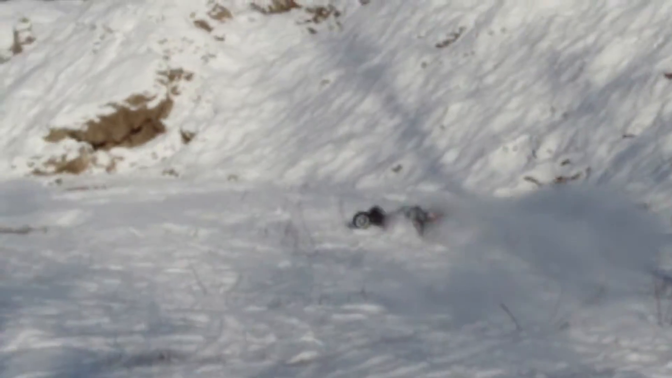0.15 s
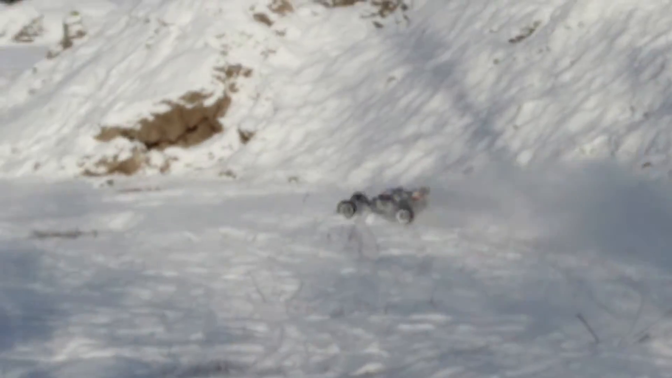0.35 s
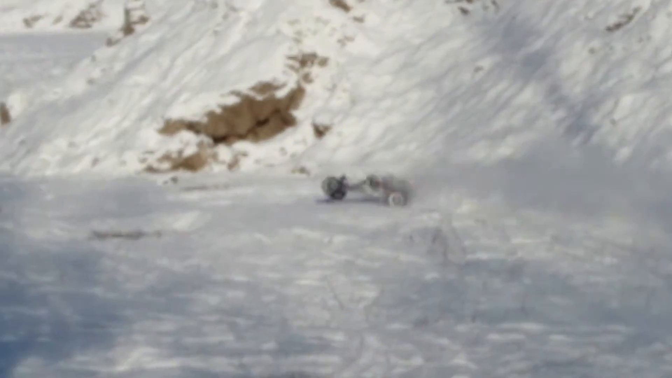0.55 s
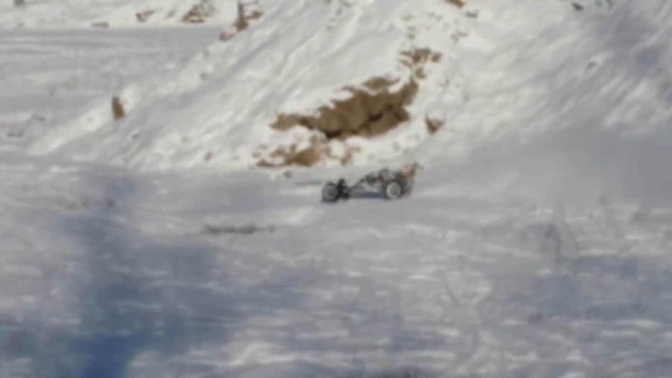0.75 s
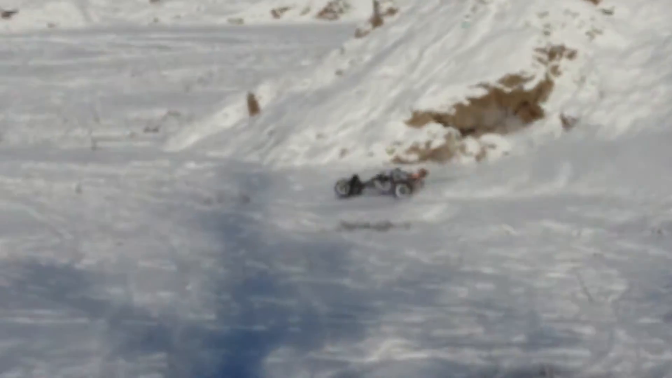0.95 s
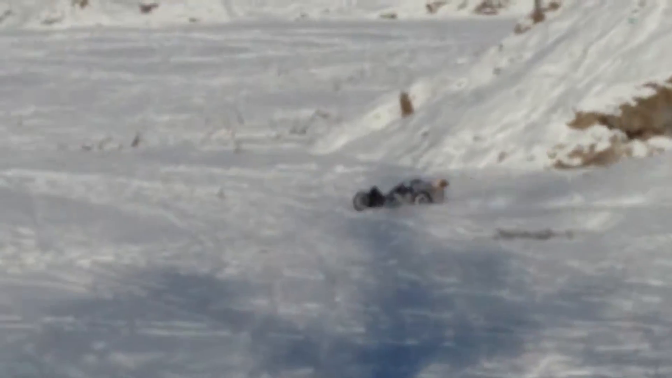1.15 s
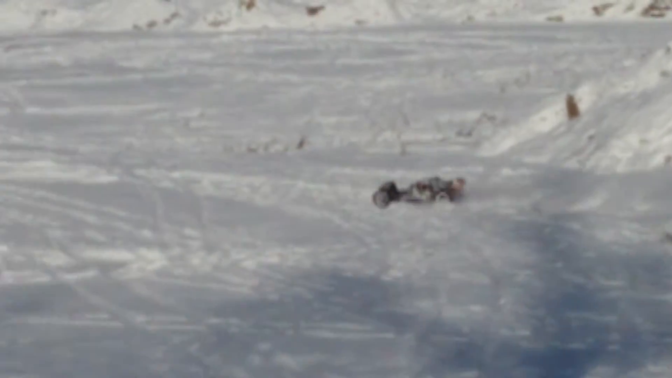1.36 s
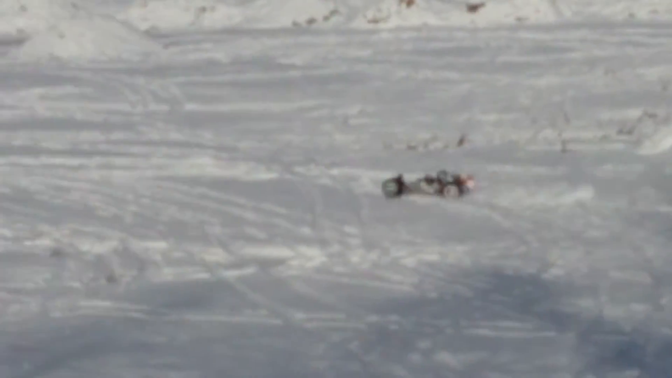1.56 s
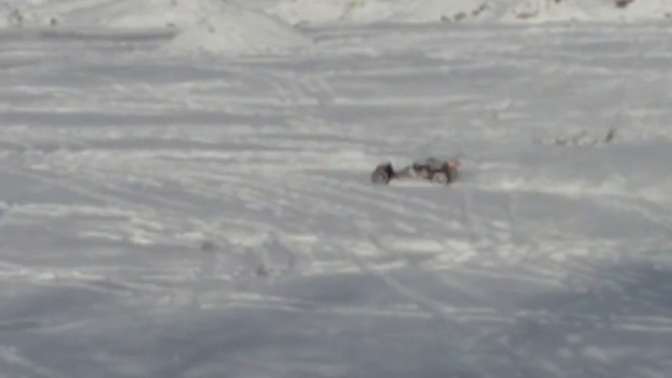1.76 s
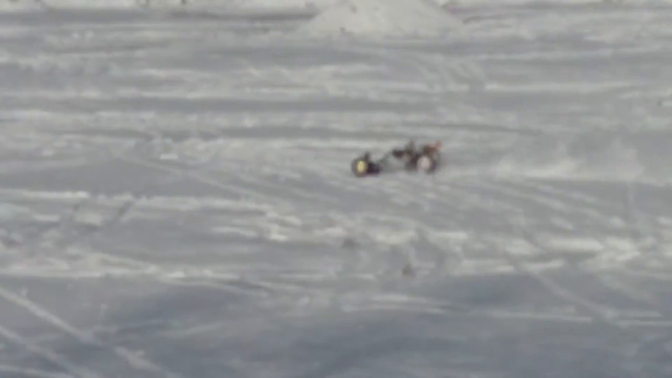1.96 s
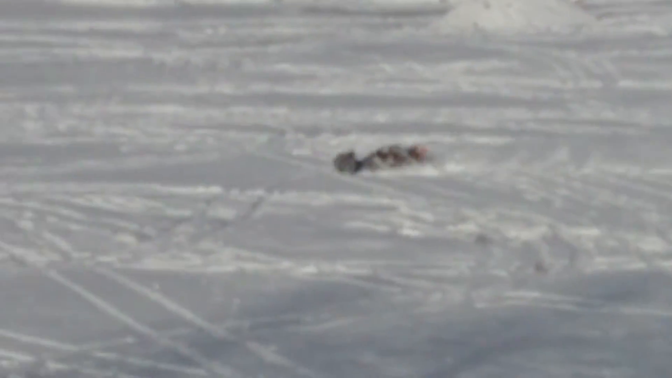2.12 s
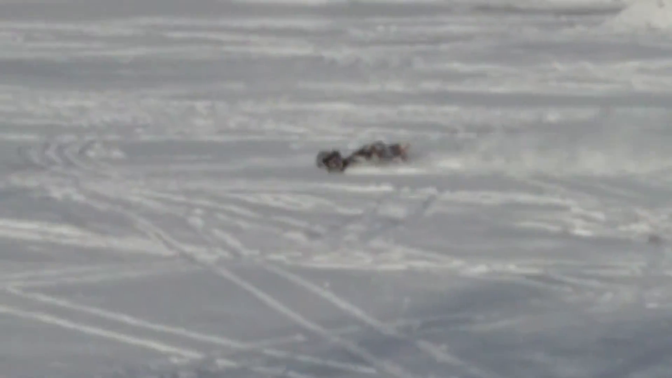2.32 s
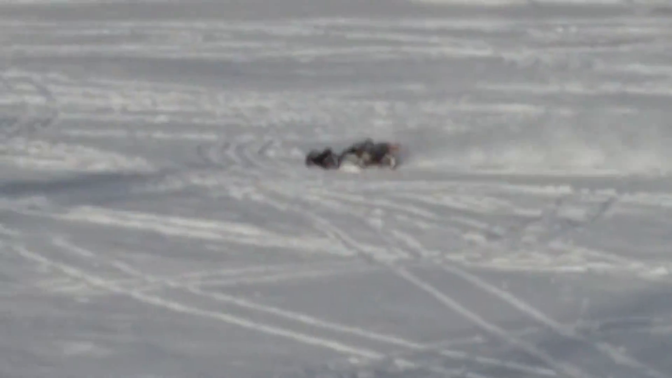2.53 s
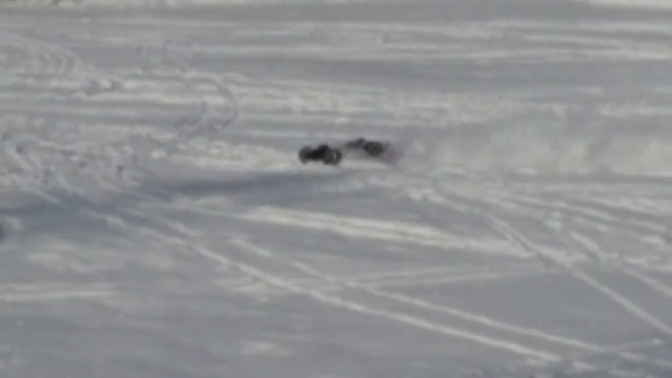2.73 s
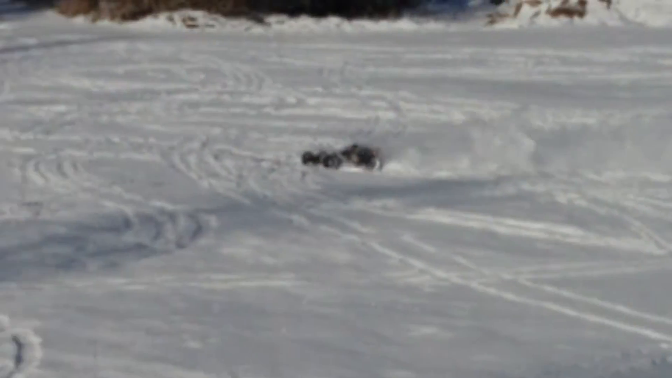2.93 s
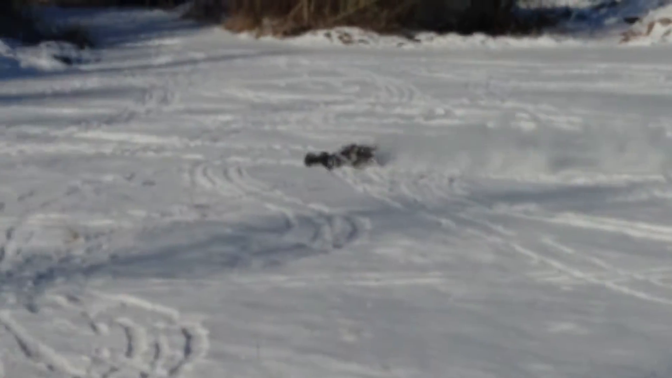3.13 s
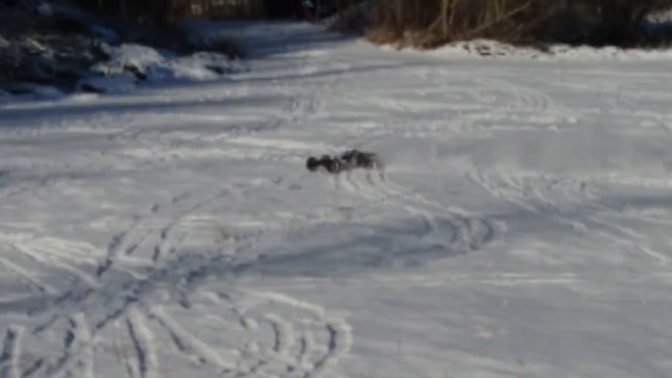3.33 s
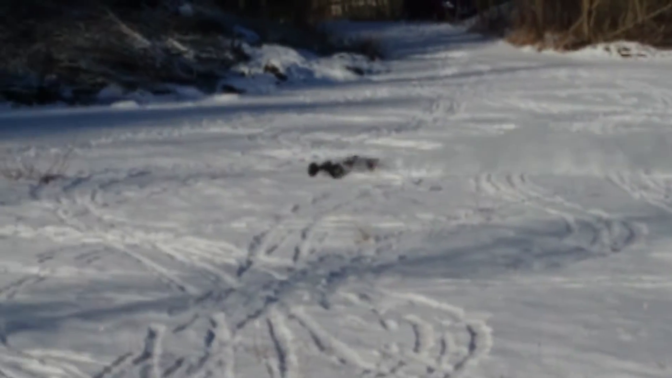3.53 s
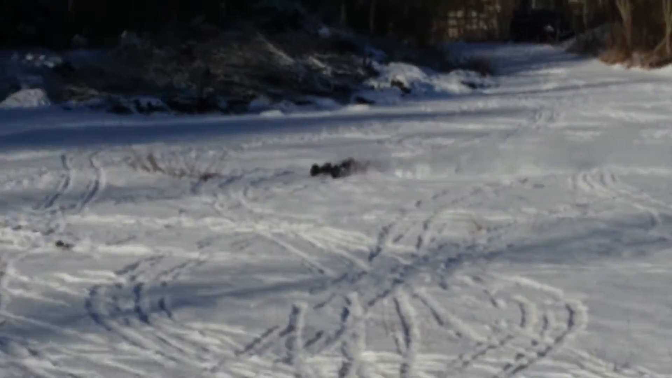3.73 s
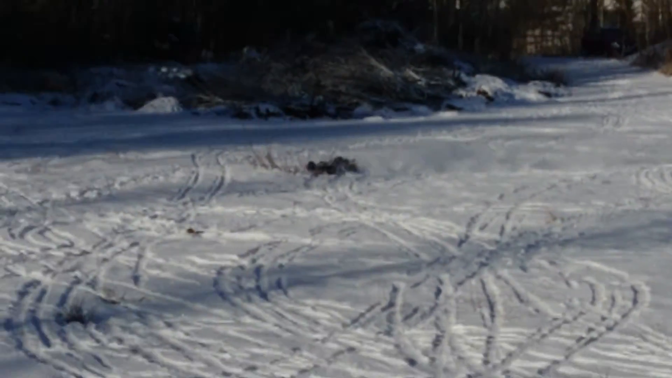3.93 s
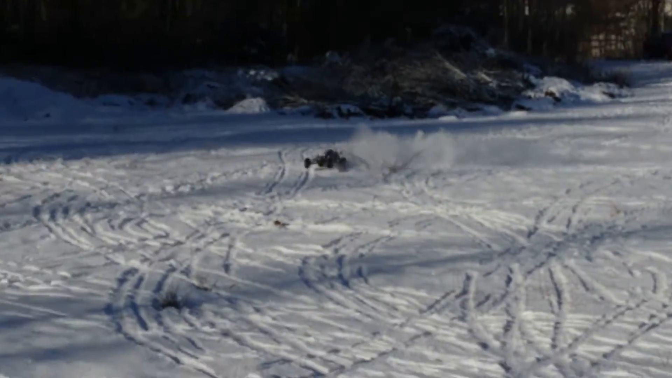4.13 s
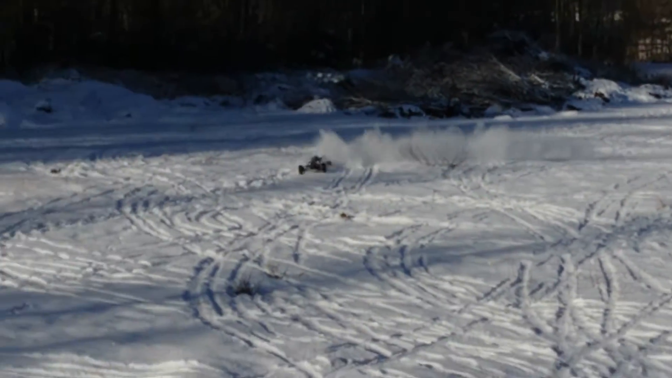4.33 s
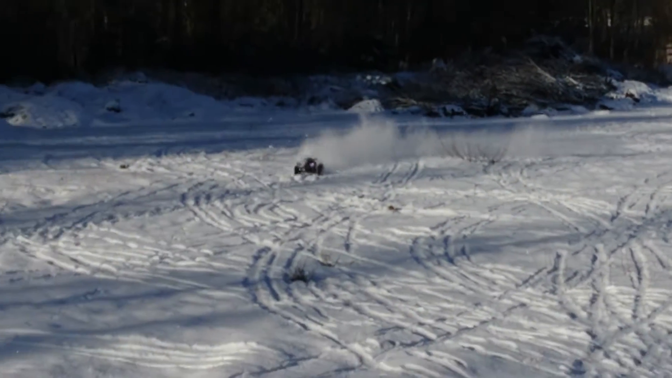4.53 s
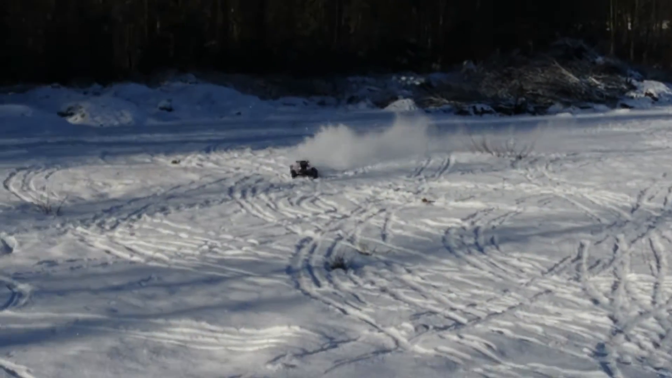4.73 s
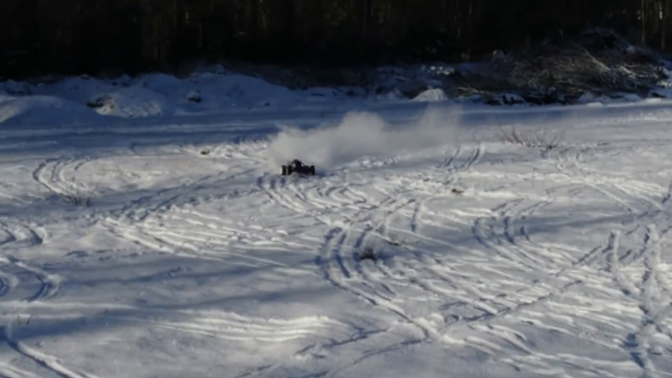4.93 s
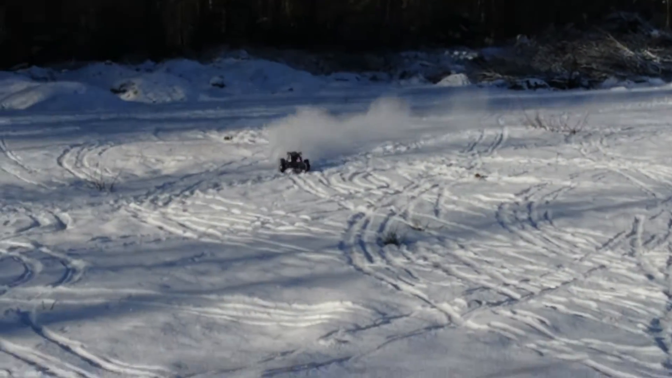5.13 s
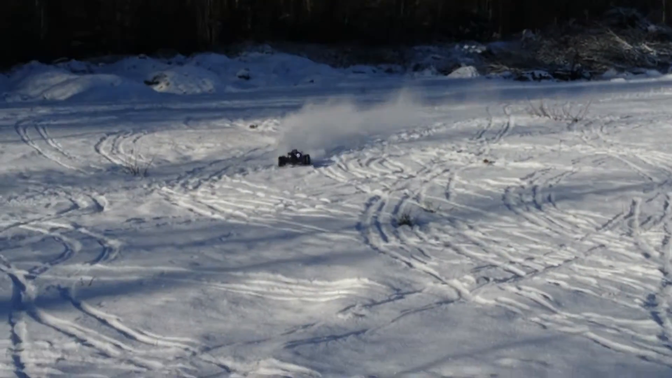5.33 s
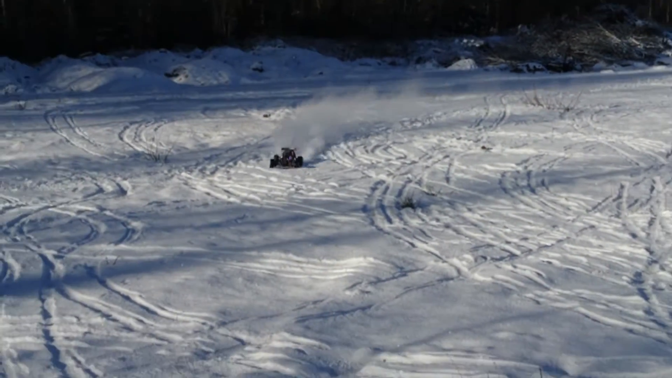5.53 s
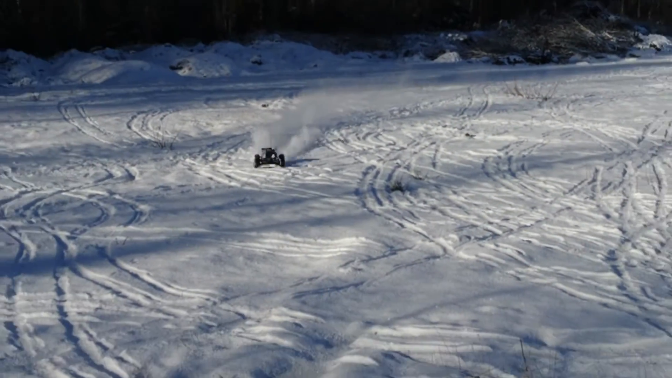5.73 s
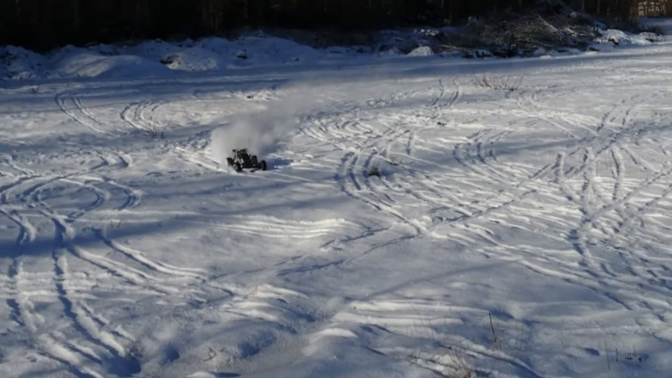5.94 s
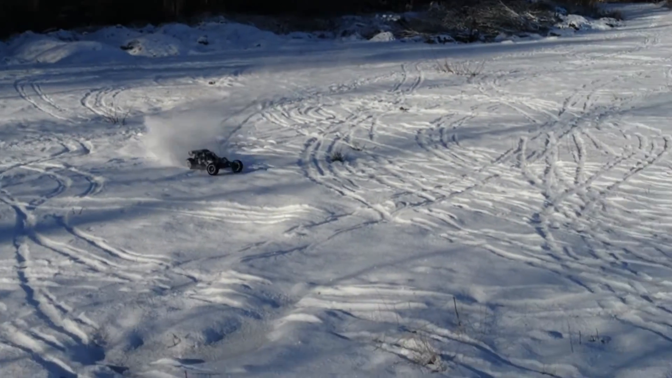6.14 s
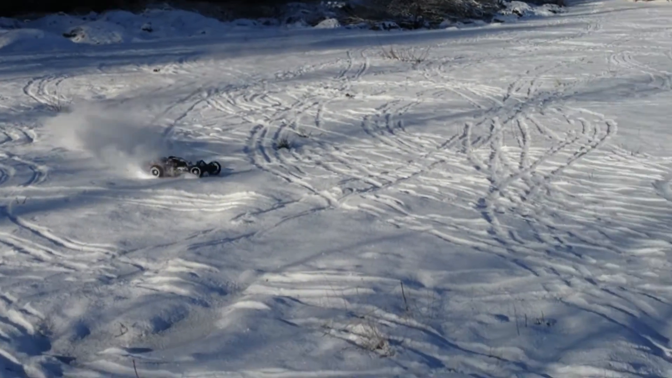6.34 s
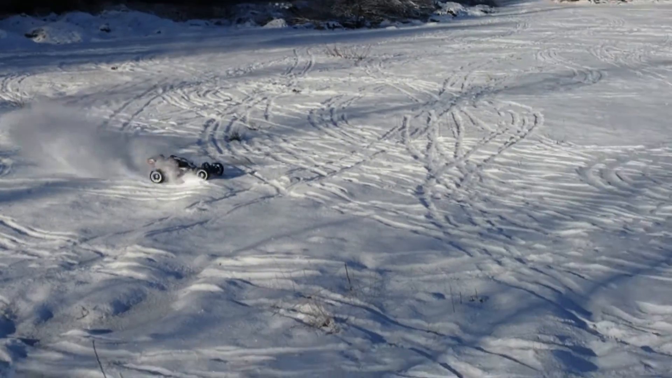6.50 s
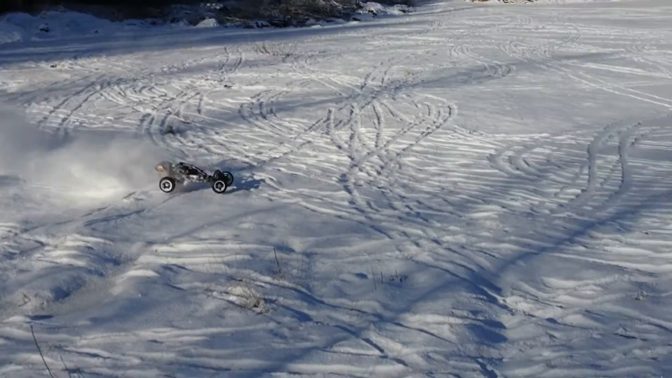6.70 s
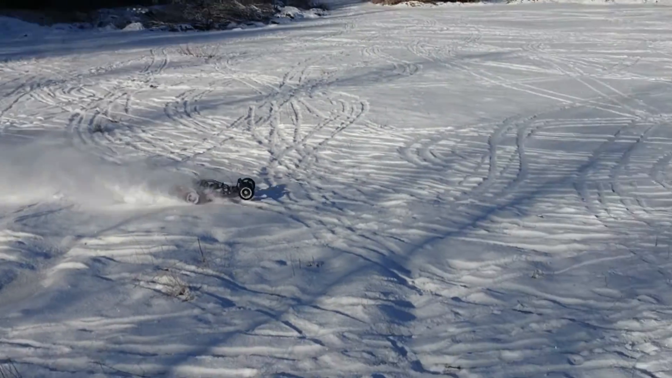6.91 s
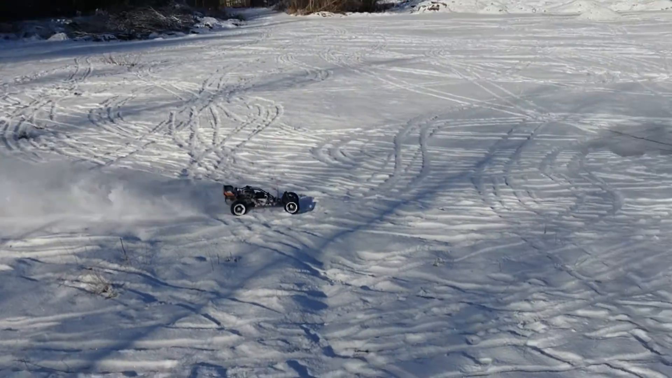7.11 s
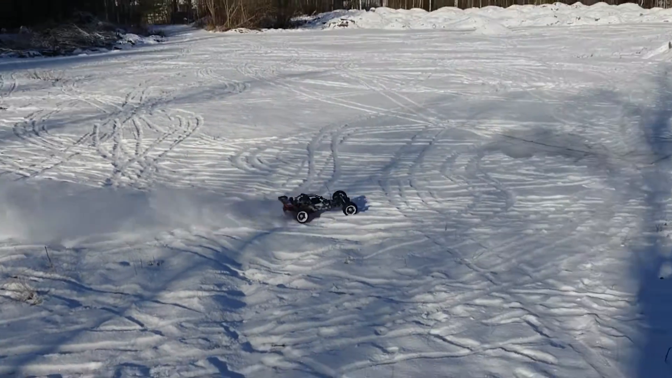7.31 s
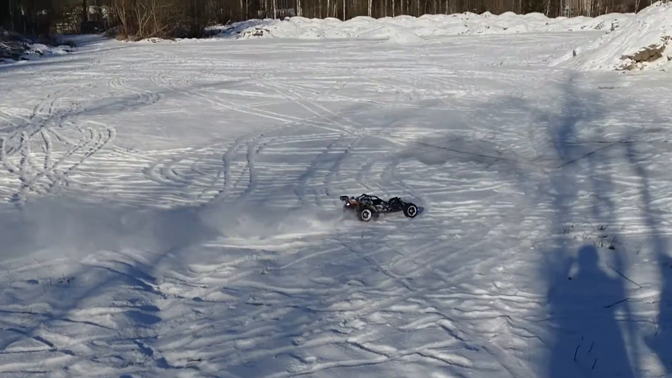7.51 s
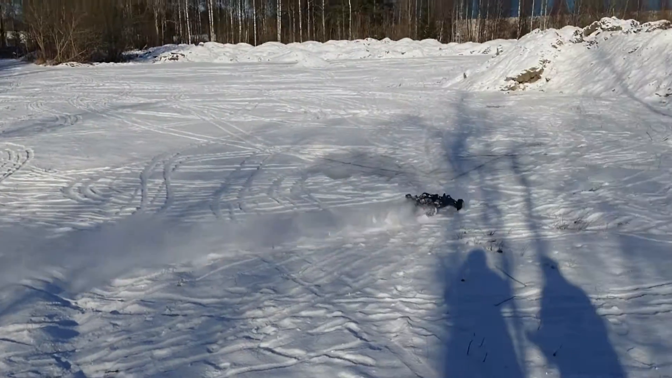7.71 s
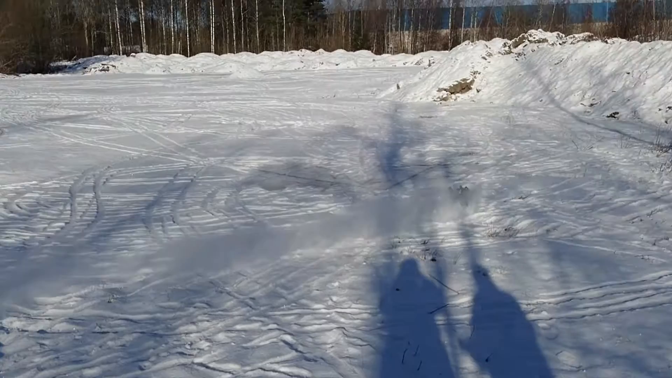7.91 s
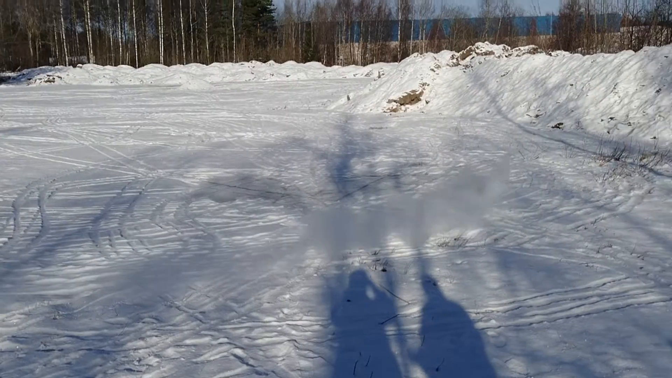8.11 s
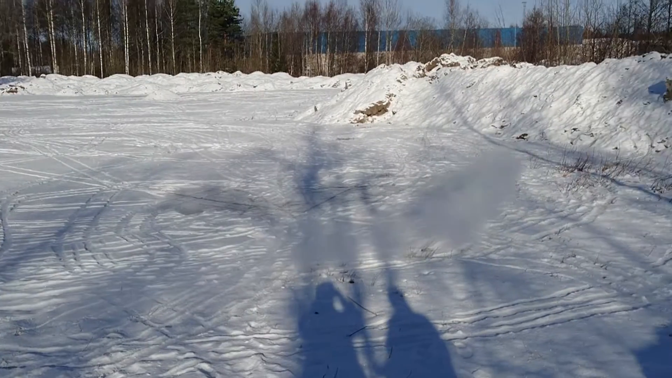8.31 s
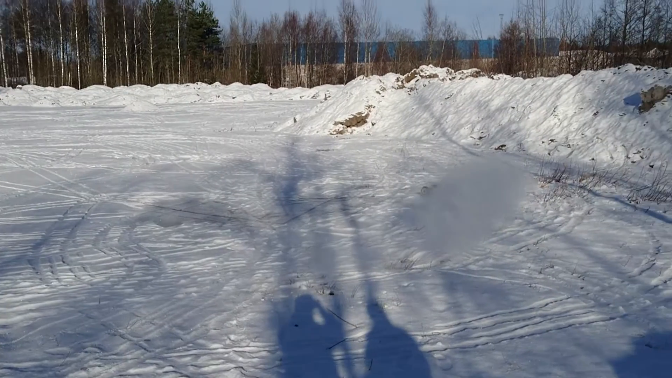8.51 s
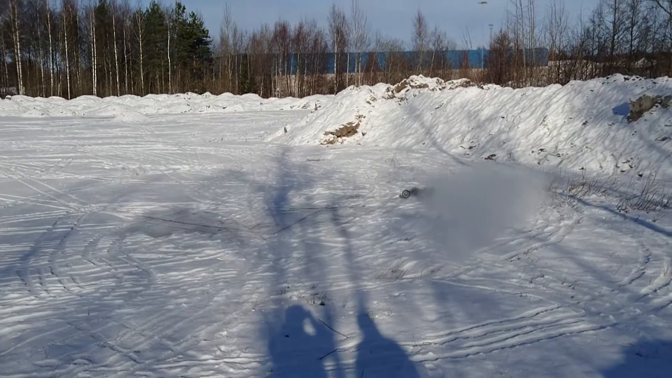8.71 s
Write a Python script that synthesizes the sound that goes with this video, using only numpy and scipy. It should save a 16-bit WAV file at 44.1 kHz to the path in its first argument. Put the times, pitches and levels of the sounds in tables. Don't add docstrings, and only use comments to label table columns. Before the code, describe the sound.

A small two-stroke model buggy runs near full throttle across an open snowy field, heard through a handheld stereo microphone. At 0 s it is close and loud, a buzzing drone around 230-250 firings per second with hissing, raspy exhaust and dull chassis slaps on snow near 0.06 and 0.24 s. It drives off, dropping steadily to its faintest around 3 s. Throughout, revs sag abruptly as wheels bite, then climb again, two to four times a second, with treble flares at hops between 1.3 and 3.7 s. From 3 to 6 s it stays distant, slightly higher in pitch, thin and ringing, with gusts of low wind near 5.5-6 s. After 6.2 s it approaches rapidly, bright and metallic, reaching full loudness at 7 s with pitch peaking near 280. It remains close, droning and rasping to the end at 8.75 s, with soft thuds near 8.2 and 8.5 s.

```python
import sys
import numpy as np
from scipy import signal
from scipy.fft import rfft, irfft
from scipy.io import wavfile
from scipy.ndimage import uniform_filter1d, map_coordinates

SR = 44100
rng = np.random.default_rng(int(sys.argv[2]) if len(sys.argv) > 2 else 0)


def master_out(mix):
    frames = np.transpose(np.atleast_2d(mix))
    ceiling = np.clip(frames, -1, 1)
    pcm = np.round(ceiling * 32767).astype(np.int16)
    wavfile.write(sys.argv[1], SR, pcm)


def volts(x):
    e = np.asarray(x, float) / 20
    return 10 ** e


N = 386316

# bite_s, bite_rate_hz, drag_s, rate_after_drag_hz
BITES = [(.04, 236, 0.14, 228.1), (.28, 234.5, 0.11, 212.6), (0.569, 246.3, 0.28, 235.7),
         (0.998, 251.6, 0.14, 230.2), (1.32, 242, 0.05, 231.8), (1.46, 244.2, 0.064, 224.3),
         (1.69, 246.8, .11, 233.8), (1.921, 244.8, .1, 239), (2.291, 262.5, 0.12, 238.2),
         (2.599, 249.6, 0.39, 239.6), (3.13, 260.5, 0.094, 238.7), (3.4, 258.4, .2, 249.7),
         (3.699, 270.2, 0.057, 242.8), (3.848, 260.1, 0.081, 244.3), (4.13, 257.4, 0.081, 237.8),
         (4.46, 270.7, .13, 245.3), (4.92, 257.6, .2, 241.2), (5.4, 264, .11, 241.4),
         (5.741, 267.8, 0.0885, 246.3), (5.949, 262.5, 0.081, 249.2), (6.12, 267.8, 0.122, 248.5),
         (6.43, 265.3, .12, 242.5), (6.73, 272.7, .05, 248), (6.96, 281.2, .11, 233.4),
         (7.291, 256, 0.12, 234.2), (7.5, 249.9, 0.094, 238.9), (7.68, 251.5, .17, 236.7),
         (7.951, 258, 0.093, 243.6), (8.12, 257.5, 0.2, 237), (8.53, 266, .11, 234.5)]
# time_s, loudness_db, nose_to_camera (0-1), pipe_side_to_camera (0-1), outlet_hidden_db
LAP = [(0, -19.5, .1, 0.94, -2), (.35, -23, 0, 0.86, -1.5), (.6, -20.5, 0.13, 0.57, -3),
       (1.1, -25, 0.07, 0.69, -3), (1.5, -26.5, 0, .75, 3), (2.2, -29.5, 0.33, 0.7, -0.5),
       (2.95, -36.5, 0.61, 0.71, -4), (3.3, -33.5, 0.58, 0.79, -21), (3.95, -34.5, 0.61, 0.73, -25),
       (4.25, -31, 0.86, 0, -29), (4.9, -33, 0.94, .05, -8), (5.5, -30.5, 1, .15, -8.5),
       (6.0, -30.5, 1, 0.17, -4.5), (6.5, -25, 0.88, 0.55, -9.5), (7.0, -16, 0.94, 0.48, -5.5),
       (7.45, -16, 0.7, .4, 1.5), (8.0, -16.5, 0.43, 0.43, -1), (8.76, -16, 0.29, 0.54, -1.5)]
# time_s, flare_db
HOPS = [(.02, 5), (1.3, 3), (1.42, 5.5), (1.68, 7.5), (1.88, 6.5), (2.17, 10), (2.38, 11), (2.52, 2.5),
        (2.66, 9.5), (2.8, 8.5), (3.11, 6.5), (3.38, 10.5), (3.67, 10.5), (3.86, 2.5), (4.1, 1), (5.0, -1),
        (5.33, 2.5), (5.95, 0.5), (6.1, 1), (6.34, 5.5), (6.93, 0.5), (8.22, -0.5), (8.49, 0)]
# time_s, glint_db
GLINTS = [
    (.25, 1),
    (2.0, -8),
    (3.4, 11),
    (4.25, 12),
    (6.18, 16),
    (6.36, 15),
    (6.75, 10),
    (8.25, 8),
]
# pitch_hz, width_hz, level_db
PIPE_DRONE = [(704, 550, -2.5), (1059, 152, 7.5), (1269, 94, 0.5)]
# pitch_hz, width_hz, level_db
RING_LOW = [(1730, 100, -36), (2064, 58, 5.5), (2465, 116, 15.5), (3003, 200, 5.5)]
RING_MIDDLE = [(3587, 202, 13), (4074, 193, 13), (4750, 230, -3)]
RING_HIGH = [(5074, 87, -10.5)]
# pitch_hz, width_hz, level_db
RASP = [(5423, 103, 15), (5816, 100, 13), (6980, 1050, 10.5), (7770, 390, 11), (8930, 970, 7.5),
        (9844, 117, 11.5), (9770, 190, 8), (10870, 900, -7)]
# pitch_hz, width_hz, level_db
SIZZLE = [(12800, 750, 0.5), (13500, 410, -2), (15300, 1300, -9)]
# start_s, peak_db
BUMPS = [(0.06, -32), (0.238, -38), (0.528, -49), (0.597, -48), (1.028, -51), (1.453, -44), (1.615, -53),
         (2.822, -48), (3.7, -55), (3.839, -60), (4.213, -53), (5.313, -49), (5.687, -48), (6.712, -50),
         (8.226, -39), (8.539, -51)]
# pitch_hz, level_db (per Hz)
AIR_COLOUR = [(15, -31), (25, -12), (27, -15), (36, -4), (113, 0.5), (156, -0.5), (190, -3.5), (250, 8.5),
              (420, -120)]
# time_s, rise_db
GUSTS = [
    (1.2, 3.14),
    (3.7, 4.14),
    (5.45, 6.83),
    (6.1, 6.4),
    (7.3, 3.06),
]
# time_s, right_port_lead_samples, low_modes_lifted_by_snow_bounce_db
AIM = [(0, -1.5, -8), (.55, 0.46, -3), (1.1, 0, -6.5), (2.2, 0.1, -5.5), (2.8, -0.34, -2.5),
       (3.7, -1.2, -1), (4.6, 1.73, -3.5), (5.1, 0, -1.5), (5.6, -1, 0), (6.6, -1, -1), (7.0, -2, -7),
       (7.3, -2, -0.5), (7.6, -1.97, -1), (7.9, -.5, 1), (8.76, 1.5, -2.5)]
# pitch_hz, width_hz, left_minus_right_db
PORT_SHADOW = [(250, 250, -6), (700, 300, -3), (1800, 400, 2), (2850, 280, -15), (3400, 300, -2),
               (4200, 300, 4), (4750, 330, 10), (5900, 450, -7), (7600, 500, -7), (10200, 800, 8),
               (15100, 600, -9)]
# pitch_hz, lead_radians
PORT_LEAD = [(1400, 0), (2300, 1.4), (2900, 4.8), (4700, 4.8), (4900, 8.2), (5450, 3.2), (5800, 1.3),
             (6300, .5), (7100, 1.3), (8000, .2), (9000, -1.3), (9800, -.5), (12000, -11.3), (16000, -11.5)]


def engine():
    mix = layers()
    turns = crank(revs())
    echo_turns = 0.47
    pulses = level(firings(turns, scatter_db=1.3, slip_s=7e-6), 0)
    echo_clock = turns + 1 - echo_turns + 0.008 * walk(6)
    echoes = level(firings(echo_clock, scatter_db=2.5, slip_s=1.6e-5), 0)
    gas = exhaust_gas(turns)
    return (boom(turns, mix) + drone(pulses, gas, mix) + roar(gas, mix) + wheeze(gas, mix)
            + ring(pulses, echoes, gas, mix) + rasp(pulses, echoes, gas, mix))


def revs():
    climb_bend, last_climb_s, flywheel_s = 1.15, 0.8, 0.016
    s, top_hz, drag_s, low_hz = np.transpose(BITES)
    times = np.append(np.ravel([s, s + drag_s], "F"), s[-1] + last_climb_s)
    rates = np.append(np.ravel([top_hz, low_hz], "F"), top_hz.mean())
    place = np.interp(np.arange(N) / SR, times, np.arange(len(times)))
    leg, part = place.astype(int), place % 1
    climbing = leg % 2
    place = leg + np.where(climbing, 1 - (1 - part) ** climb_bend, part)
    return uniform_filter1d(np.interp(place, np.arange(len(rates)), rates), int(flywheel_s * SR))


def crank(hz):
    noise = rng.standard_normal((2, N))
    wheel_rate = [(22, 14, 0)]
    shudder = level(modes(modes(noise[0], wheel_rate), wheel_rate), 0)
    burns = level(steep(noise[1], 75, "low"), 0)
    return np.cumsum(hz * (1 + 0.012 * shudder + 0.005 * burns)) / SR


def firings(turns, scatter_db, slip_s):
    chance = rng.standard_normal((N // 100, 2))
    whole = np.arange(1, int(turns[-1]))
    at = np.interp(whole, turns, np.arange(N)) + slip_s * SR * chance[whole, 0]
    taps = np.floor(at)[:, None].astype(int) + np.arange(-7, 9)
    away = taps - at[:, None]
    strength = volts(scatter_db * chance[whole, 1])[:, None]
    click = np.sinc(away) * np.cos(np.pi * away / 16) ** 2 * strength
    out = np.zeros(N + 32)
    np.add.at(out, np.clip(taps, 0, N + 31), click)
    return out[:N]


def exhaust_gas(turns):
    opening = np.exp(-(turns % 1) / 3.3)
    returning = np.exp(-((turns - 0.48) % 1) / 0.14)
    noise = rng.standard_normal((3, N))
    return level((opening + returning + 0.19) * (noise[0] + 2.6 * noise[1:]), 0)


def boom(turns, mix):
    uneven = level(steep(rng.standard_normal(N), 62, "low"), 0)
    strength = volts(0.5 * uneven + 0.84 * walk(25))
    first = np.sqrt(2) * np.sin(2 * np.pi * turns) * strength * volts(mix["boom"])
    second_db = mix["drone"] + mix["second"] + 0.74 * walk(13)
    second = np.sqrt(2) * np.sin(4 * np.pi * turns + 1) * strength ** 2 * volts(second_db)
    return first + second


def drone(pulses, gas, mix):
    hum = pulses + volts(-17) * gas
    low = volts(mix["drone_low"]) * modes(hum, PIPE_DRONE[:1], flicker_db=1.6)
    middle = modes(hum, PIPE_DRONE[1:2], flicker_db=1.6)
    top = volts(mix["drone_top"]) * modes(hum, PIPE_DRONE[2:], flicker_db=1.6)
    sound = steep(steep(low - middle + top, 640, "high"), 1400, "low")
    return level(sound, 0) * volts(mix["drone"])


def roar(gas, mix):
    rush = modes(gas, [(308, 210, -1.5), (646, 610, 0)], sign=-0.9)
    return level(rush, -21) * volts(0.11 * mix["boom"] + 0.47 * mix["drone"] + 0.44 * mix["ring"])


def wheeze(gas, mix):
    gulp = modes(gas.sum(axis=0) + 1.1 * gas, [(1643, 380, 0)])
    return level(gulp, -7) * volts(mix["drone"])


def ring(pulses, echoes, gas, mix):
    blow = pulses + 0.45 * echoes + volts(-12 - 0.2 * (mix["second"] + 11)) * gas
    sound = modes(blow, RING_MIDDLE, flicker_db=1.27)
    sound = sound + volts(mix["ring_low"]) * modes(blow, RING_LOW, flicker_db=1.5)
    sound -= volts(mix["ring_high"]) * modes(blow, RING_HIGH, flicker_db=5.0)
    sound = steep(steep(steep(sound, 1600, "high"), 1850, "high"), 5500, "low")
    return level(sound, 0) * volts(mix["ring"] + 4.0)


def rasp(pulses, echoes, gas, mix):
    spit = pulses + 0.6 * echoes + volts(-5) * gas
    sound = modes(spit, RASP, sign=-1.012, flicker_db=2.5)
    sound = sound - volts(mix["sizzle"]) * modes(spit, SIZZLE, sign=-1.46, flicker_db=2.5)
    return level(steep(sound, 5100, "high"), 0) * volts(mix["rasp"] + 4.5)


def layers():
    loud_db, nose, flank, hidden_db = curves(LAP)
    hop_db = swells(HOPS, 0.08)
    return {
        "boom": loud_db - 6 + hidden_db,
        "drone": loud_db - 23 + 18.5 * nose,
        "ring": loud_db + 0.31 * hop_db,
        "rasp": loud_db - 4.5 - 4.5 * nose + hop_db,
        "second": -26.5 + 26.5 * flank,
        "drone_low": 6.5 - 5.5 * nose,
        "drone_top": 0.5 + 10.5 * flank,
        "ring_low": curves(AIM)[1],
        "ring_high": 4 + 9.5 * nose + swells(GLINTS, 0.11),
        "sizzle": -1.5 + nose + (loud_db + 27),
    }


def bumps():
    pitch_hz, onset_s, fade_60db_s = 117, 0.011, 0.17
    out, t = np.zeros(N + SR), np.arange(SR // 2) / SR
    fade = np.exp(-np.log(1000) * t / fade_60db_s)
    thud = (1 - np.exp(-t / onset_s)) * fade * np.sin(2 * np.pi * pitch_hz * t)
    for s, db in BUMPS:
        start = int(s * SR)
        out[start:start + len(t)] += volts(db + 8.0) * thud
    return out[:N]


def air(near_db):
    f = np.maximum(np.fft.rfftfreq(N, 1 / SR), 1)
    hz, db = np.transpose(AIR_COLOUR)
    colour = volts(np.interp(np.log(f), np.log(hz), db))
    noise = rng.standard_normal((3, N))
    rumble = irfft(rfft(noise[0] + noise[1:]) * colour, N)
    return level(rumble, -31.5) * volts(0.6 * near_db + walk(9) + swells(GUSTS, 0.26))


def modes(x, table, sign=1, flicker_db=0):
    out = 0
    for k, (hz, width, db) in enumerate(table):
        b, a = signal.iirpeak(hz, hz / width, SR)
        out = out + sign ** k * volts(db + flicker_db * walk(22)) * signal.lfilter(b, a, x)
    return out


def walk(rate):
    knots = rng.standard_normal(N // 200)
    ramps = np.interp(np.arange(N) * rate / SR, np.arange(len(knots)), knots)
    return 1.24 * uniform_filter1d(ramps, int(SR / rate / 2))


def swells(table, half_s):
    t = np.arange(N) / SR
    return sum(db * np.exp(-((t - s) / half_s) ** 2) for s, db in table)


def curves(table):
    s, *columns = np.transpose(table)
    return [np.interp(np.arange(N) / SR, s, c) for c in columns]


def level(x, db):
    return x * volts(db) / np.sqrt(np.mean(x ** 2))


def steep(x, hz, kind):
    return signal.sosfilt(signal.butter(4, hz, kind, fs=SR, output="sos"), x)


def scene():
    mix = layers()
    return engine() + bumps() + air(0.76 * mix["ring"] + 0.34 * mix["boom"])


def low_pass(x):
    return signal.sosfilt(signal.butter(12, 16650, fs=SR, output="sos"), x)


def record(dry):
    f = np.fft.rfftfreq(N, 1 / SR)
    tilt_db = sum(db * np.exp(-((f - hz) / width) ** 2) for hz, width, db in PORT_SHADOW)
    lead = np.interp(f, *np.transpose(PORT_LEAD))
    half = volts(tilt_db / 2) * np.exp(-0.5j * lead)
    ports = irfft(rfft(dry) * np.array([half, 1 / half]), N)
    lag = curves(AIM)[0] / 2
    ports = [map_coordinates(port, [np.arange(N) + side * lag], order=3, mode="nearest")
             for port, side in zip(ports, (-1, 1))]
    flattened = 1.03 * np.tanh(np.array(ports) / 1.09)
    top = signal.ellip(16, 0.2, 80, 15730, fs=SR, output="sos")
    return low_pass(np.clip(signal.sosfilt(top, flattened), -1, 1))


dry = scene()
out = record(dry)
master_out(out)
```